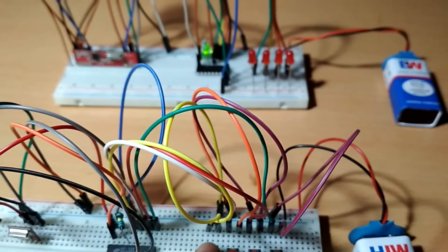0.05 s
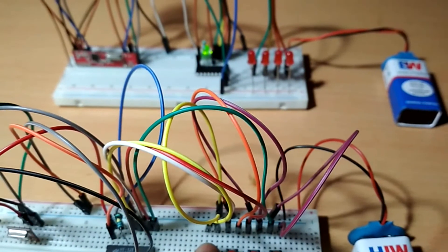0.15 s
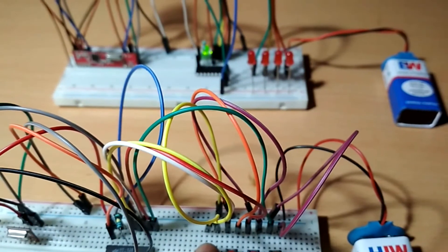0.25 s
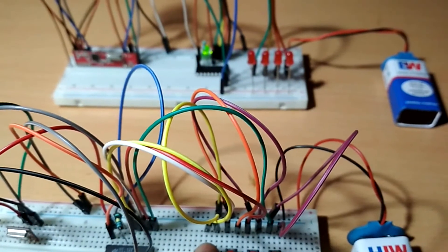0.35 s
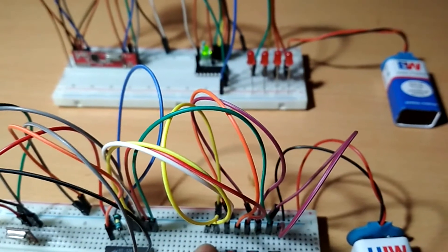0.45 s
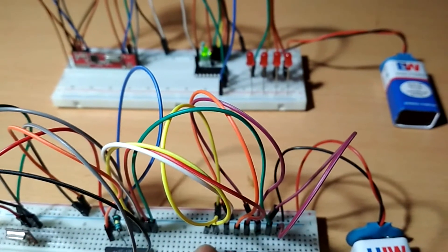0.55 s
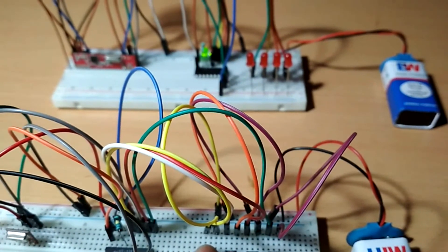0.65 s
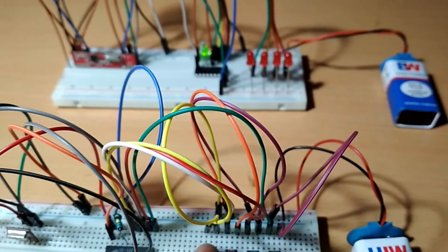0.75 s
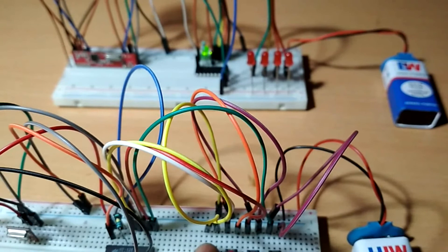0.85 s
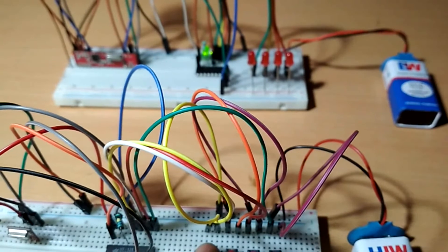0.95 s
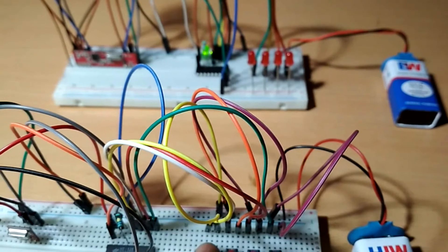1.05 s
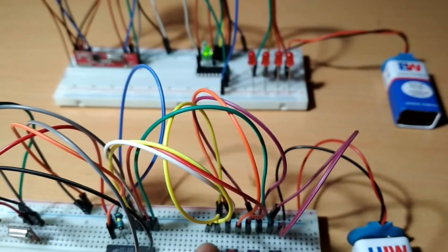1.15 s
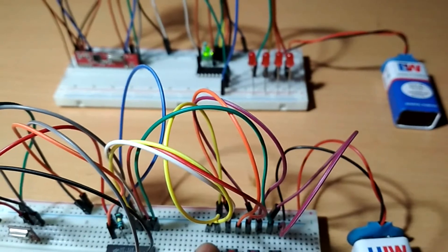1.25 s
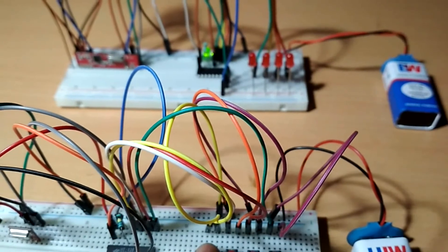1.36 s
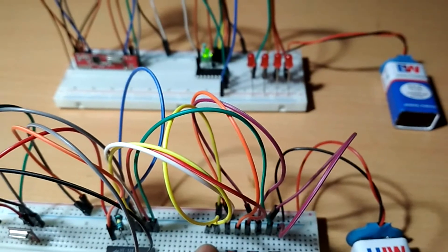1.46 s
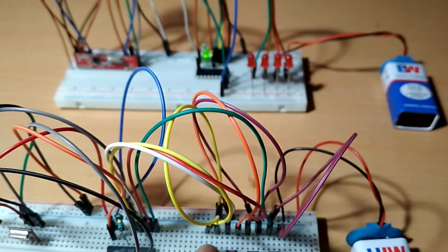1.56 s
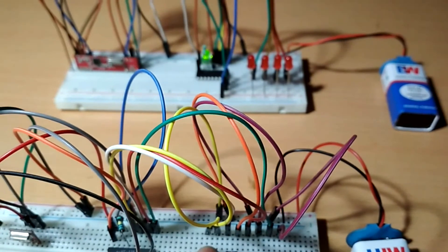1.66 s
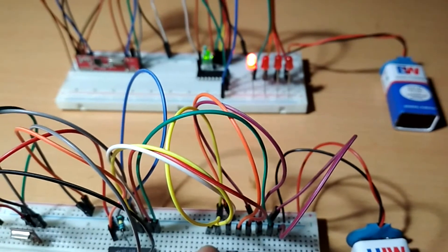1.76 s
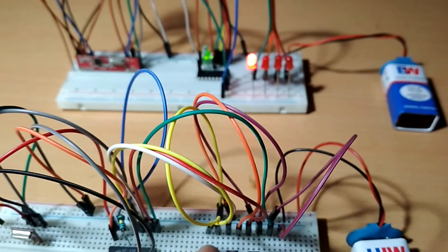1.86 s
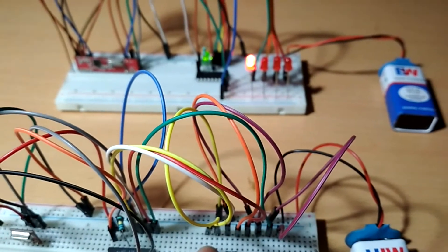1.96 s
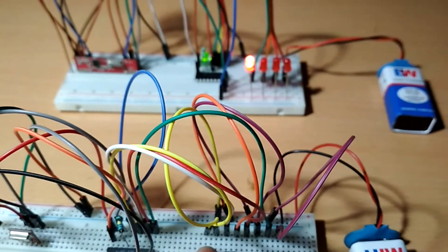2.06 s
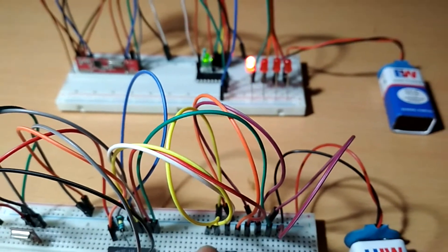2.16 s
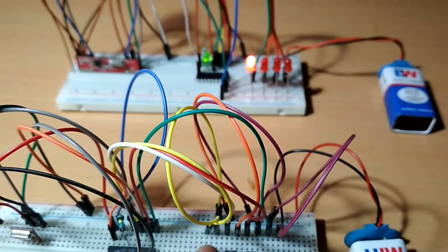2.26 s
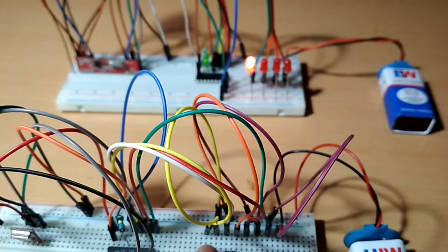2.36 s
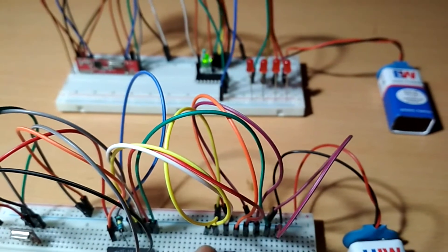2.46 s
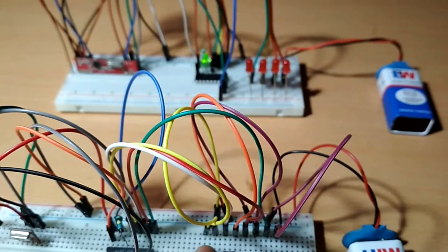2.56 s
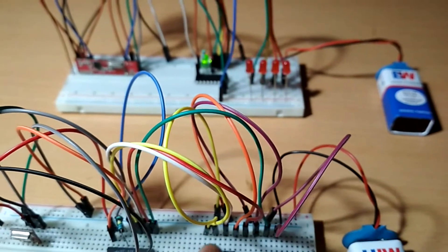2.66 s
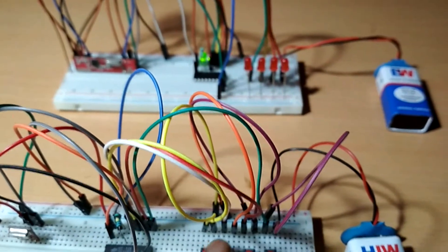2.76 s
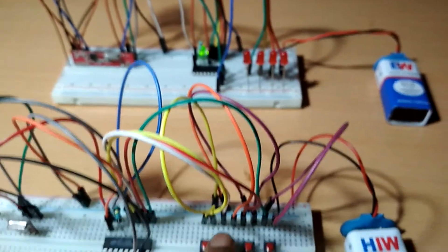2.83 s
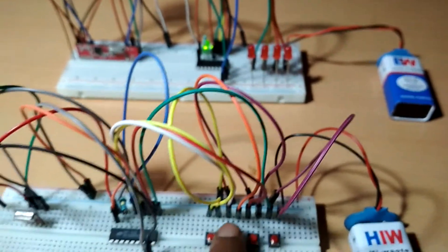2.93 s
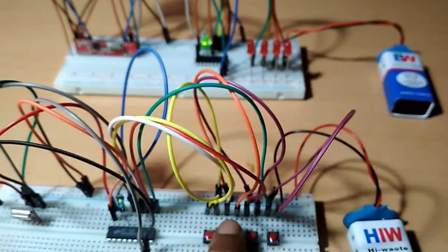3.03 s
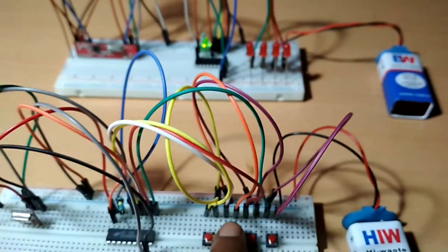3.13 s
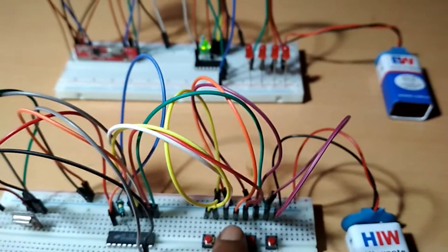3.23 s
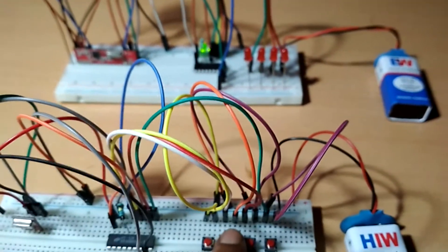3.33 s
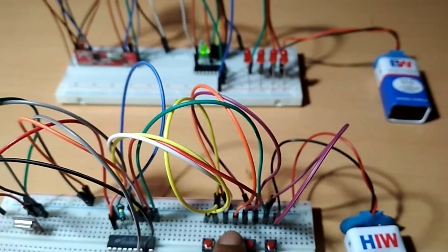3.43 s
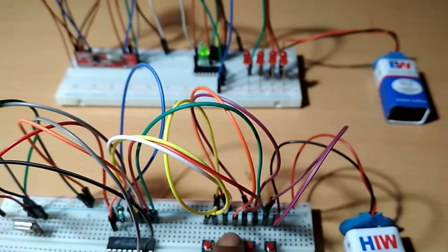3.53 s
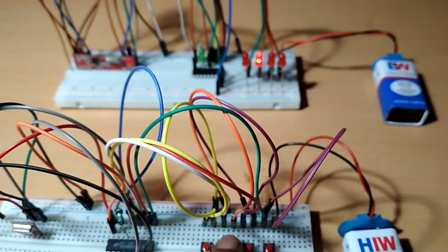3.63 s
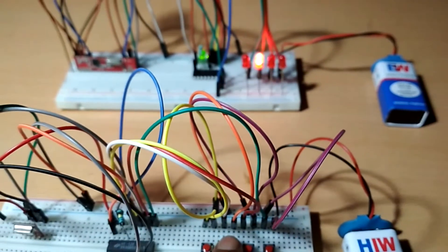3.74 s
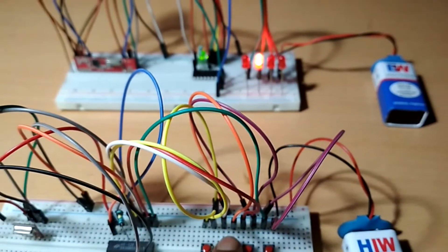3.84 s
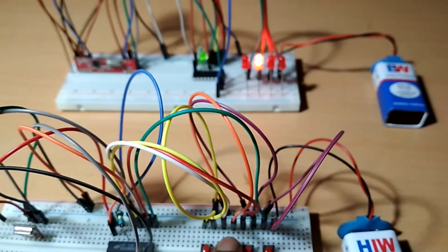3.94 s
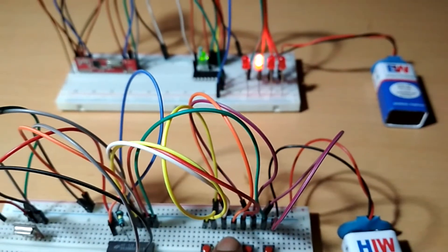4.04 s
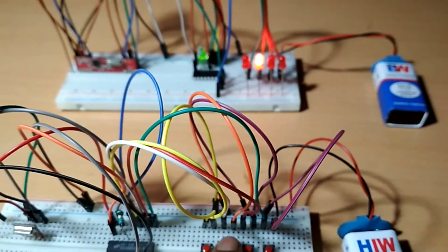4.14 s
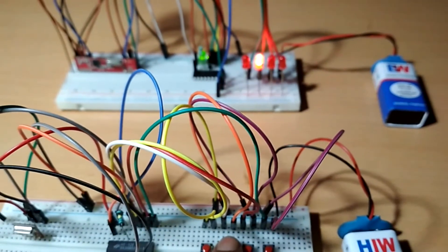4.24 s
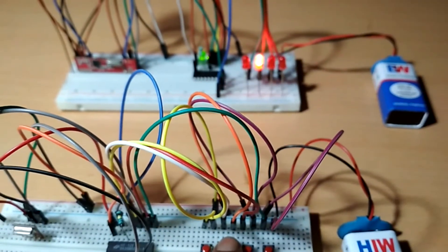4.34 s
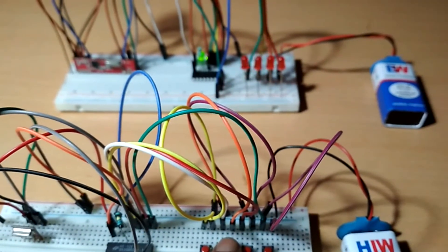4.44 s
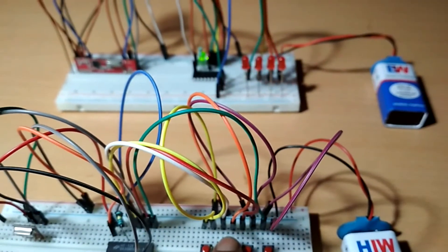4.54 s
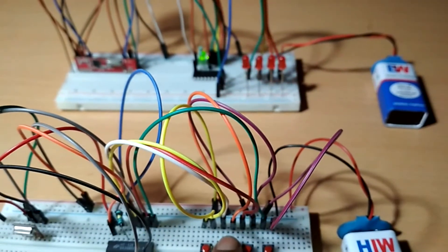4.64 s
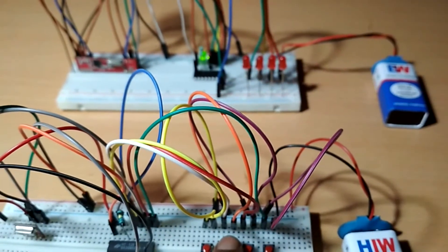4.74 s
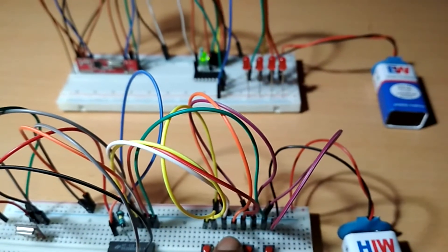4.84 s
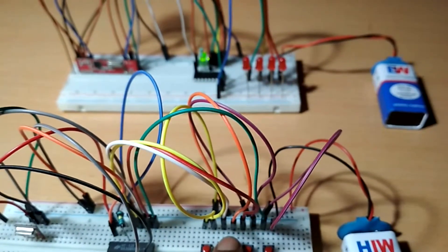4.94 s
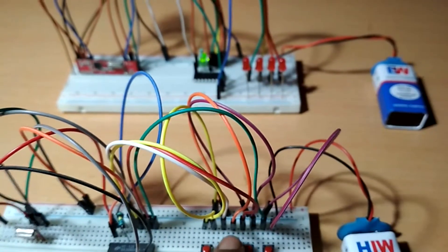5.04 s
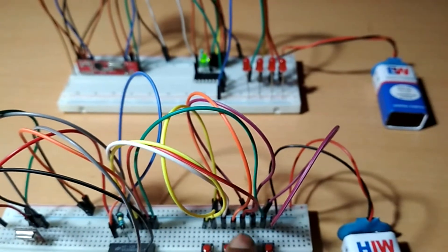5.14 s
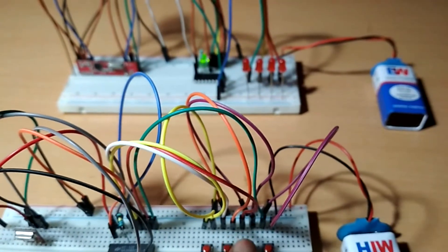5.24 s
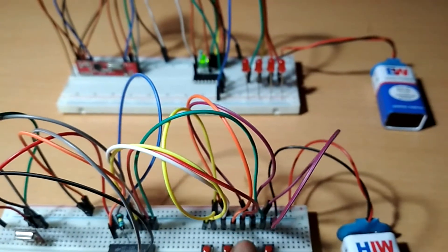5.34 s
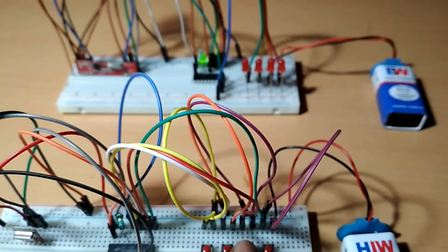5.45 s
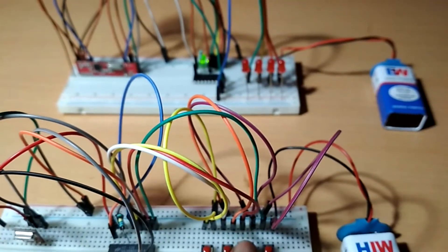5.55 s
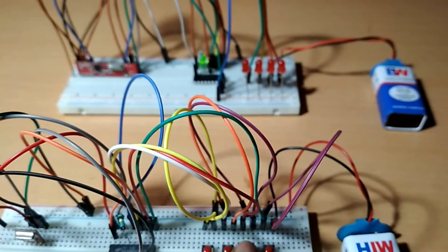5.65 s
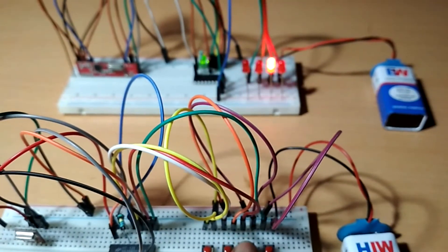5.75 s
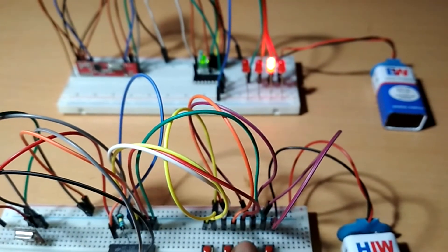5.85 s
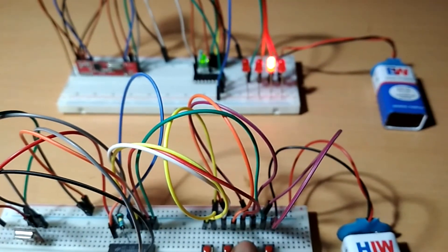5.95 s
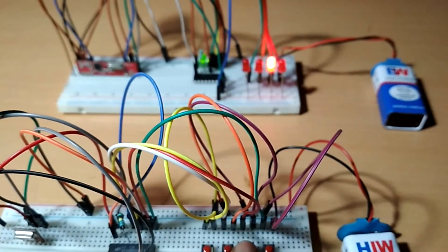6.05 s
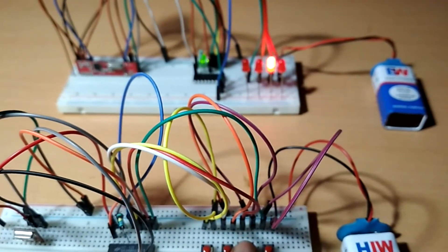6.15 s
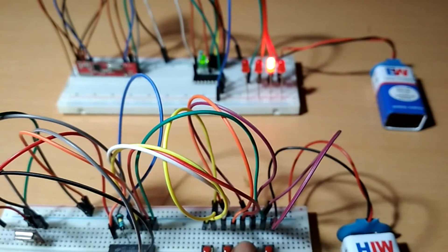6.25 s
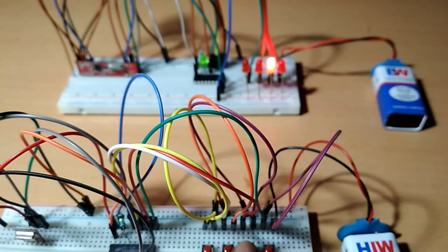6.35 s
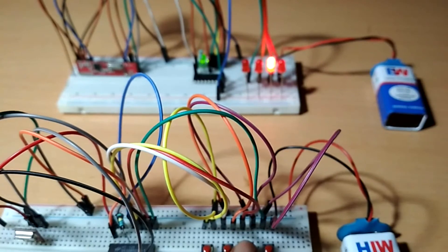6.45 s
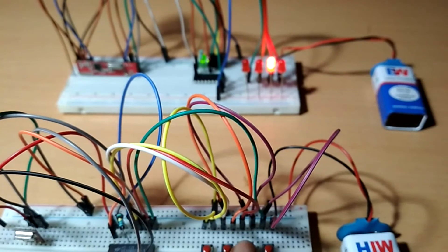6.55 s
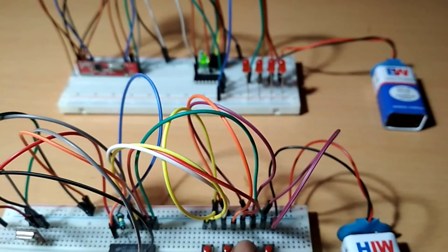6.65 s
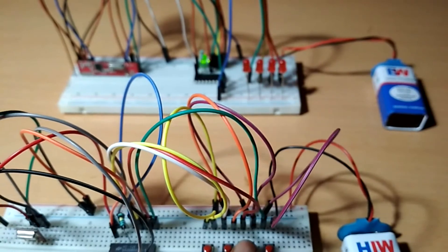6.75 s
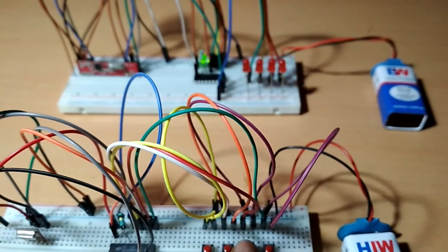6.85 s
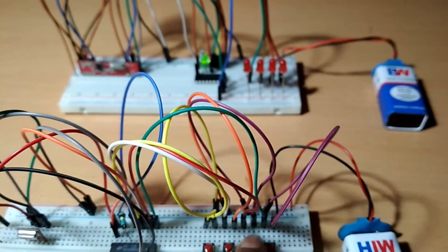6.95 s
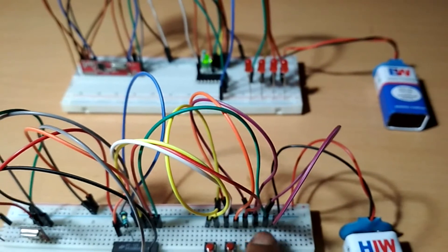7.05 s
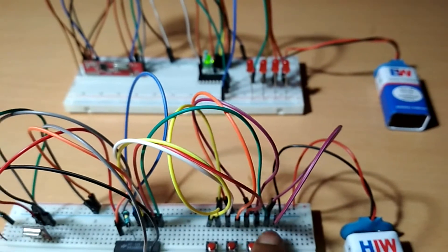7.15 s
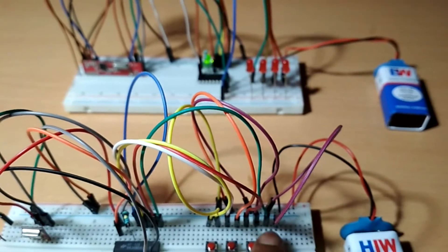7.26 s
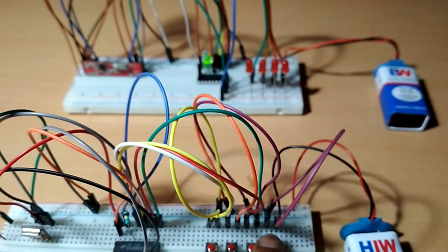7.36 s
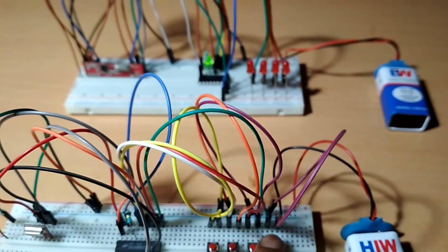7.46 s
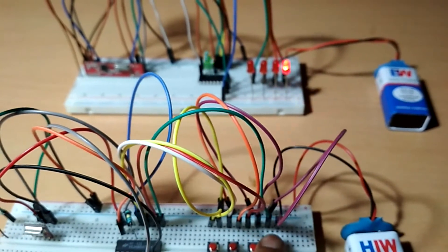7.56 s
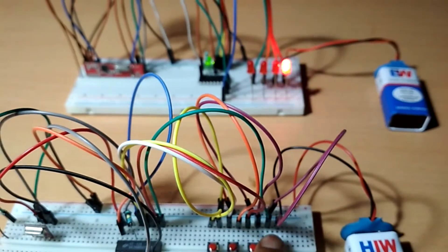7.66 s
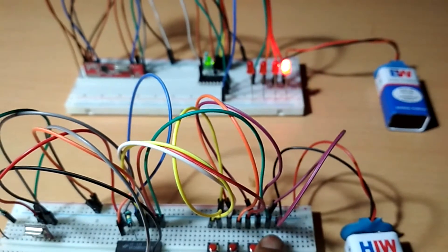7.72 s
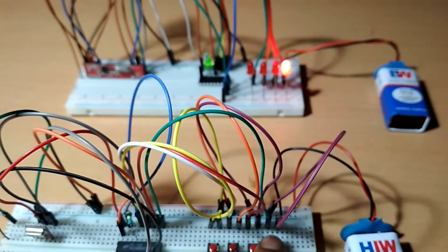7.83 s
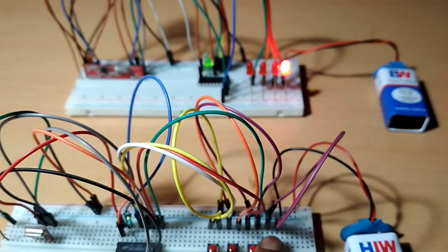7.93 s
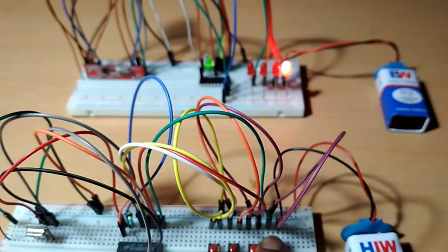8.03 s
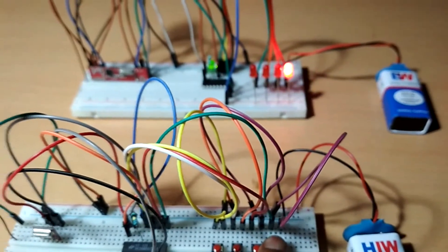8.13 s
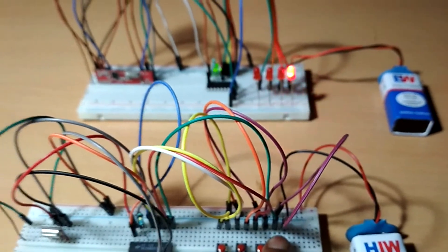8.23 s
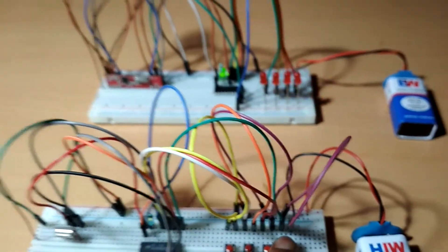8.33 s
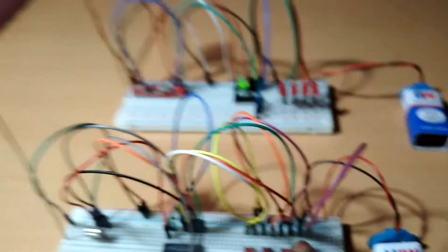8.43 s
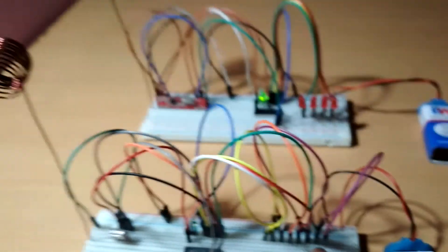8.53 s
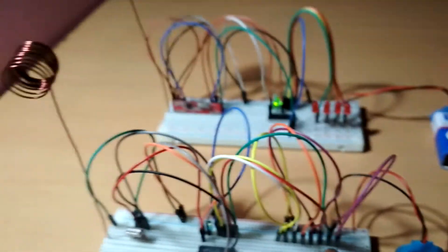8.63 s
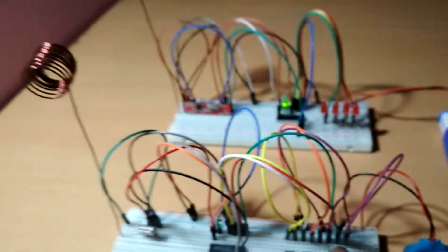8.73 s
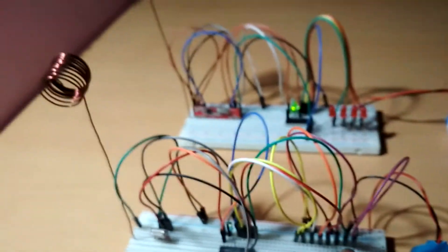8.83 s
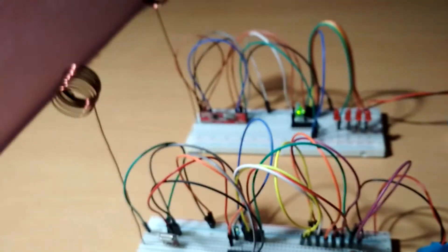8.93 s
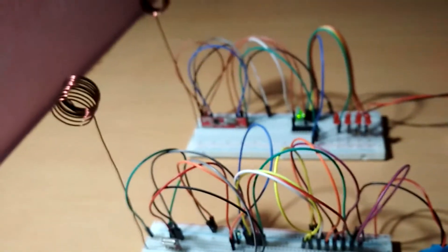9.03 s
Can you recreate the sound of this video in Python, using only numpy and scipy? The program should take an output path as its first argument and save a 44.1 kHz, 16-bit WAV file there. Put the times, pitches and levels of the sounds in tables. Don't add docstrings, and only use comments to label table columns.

```python
import sys
import numpy as np
from scipy import signal
from scipy.fft import rfft, irfft
from scipy.io import wavfile
from scipy.ndimage import uniform_filter1d

SR = 44100
rng = np.random.default_rng(int(sys.argv[2]) if len(sys.argv) > 2 else 0)


def store_pcm(level_fs):
    pcm = np.round(np.clip(level_fs, -1, 1) * 32767).astype(np.int16)
    wavfile.write(sys.argv[1], SR, np.atleast_2d(pcm).T)


def amplitude_ratio(level_db):
    exponent = np.asarray(level_db, float) / 20
    return 10 ** exponent


N = 400869

# pitch_hz, level_db (per Hz)
AIR_LEVELS = [(76, -29), (130, 0.5), (156, -7), (187, -3), (224, -4.5), (258, -5), (378, -12), (418, -8),
              (444, -15.5), (765, -11), (881, -16), (1750, -16), (3260, -20), (11800, -26), (16000, -30.5)]
# pitch_hz, likeness (0 to 1)
PORT_LIKENESS = [(60, 0.98), (180, 0.94), (550, 0.75), (1650, 0.1), (4970, 0.0), (15000, 0.094)]
# pitch_hz, left_minus_right_db
PORT_BALANCE = [(60, 0.0), (130, 0), (290, 1), (640, -2.5), (1410, 10), (3100, -1), (6820, 0.5),
                (15000, -12)]
# peak_s, peak_db, rise_s, fall_s
GRIP_SHIFTS = [
    (0.0, -55, .1, .12),
    (1.05, -64, 0.62, 0.37),
    (2.45, -49.5, 0.048, 0.14),
    (2.86, -54, 0.24, 0.2),
    (3.14, -58, 0.28, 0.42),
    (5.72, -65, 0.71, .6),
    (6.93, -64.5, .4, 0.59),
    (8.25, -64, 0.42, 0.57),
    (8.89, -68, .3, 0.29),
]
# peak_s, peak_db, rise_s, fall_s
TRAFFIC_SWELLS = [
    (0.0, -61, .3, 0.28),
    (1.47, -61.5, 0.12, 0.69),
    (2.33, -55, 0.33, 0.35),
    (2.97, -61, .6, 0.97),
    (5.25, -65.5, 1, 0.95),
    (5.87, -64, 0.44, 0.41),
    (6.61, -65.5, 0.37, 0.47),
    (7.54, -57, 0.14, 0.49),
    (8.75, -64, 0.96, 0.88),
]
# pitch_hz, width_hz, level_db
DRONE_BANDS = [(75.4, 13.7, 3.5), (96, 36.5, 0), (113.44, 5.9, 2)]
# pitch_hz, width_hz, level_db
WHIRR_BANDS = [(416, 31, -77), (595, 26, -88.5), (648.7, 10, -78.5), (1740, 184, -74.5),
               (10440, 3200, -70.5)]
# start_s, level_db, pitch_hz, left_minus_right_db
HAND_BUMPS = [
    (0.577, -45, 176, 33),
    (1.203, -52.5, 126, 22),
    (2.193, -38.5, 218, 32),
    (2.26, -58, 119, 1),
    (2.533, -38.5, 216, 24),
    (2.779, -50.5, 252, 23),
    (6.498, -64.5, 121, -2.0),
    (8.183, -47.5, 177, 20),
]
# start_s, level_db, pitch_hz, room_db (against the tap)
BOARD_TAPS = [(1.052, -45.5, 720, -37), (1.202, -50, 1620, -31), (1.736, -23.5, 1300, -26),
              (2.434, -36, 1190, -19.5), (2.779, -54.5, 1610, -28), (3.6728, -22, 1580, -25),
              (4.451, -34, 1430, -22.5), (5.2133, -36, 980, -38), (5.714, -21.5, 1740, -26.5),
              (6.699, -34, 1470, -33), (7.292, -39.5, 680, -38.5), (7.5901, -19, 1850, -29.5),
              (8.277, -55, 775, -15)]
# start_s, desk_db, pitch_hz, edge_db (against desk), room_db (against knock)
DESK_KNOCKS = [(1.736, -37, 284, -32, -17), (2.434, -29, 237, -4.5, -21.5), (3.671, -28, 298, -39, -22),
               (4.451, -30, 240, -15, -21.5), (5.715, -37.5, 380, -21, -6), (6.697, -25, 260, -31, -29.5),
               (6.762, -35, 238, -26, -23), (6.792, -38, 246, -29, -31), (7.592, -26, 363, -1.5, -18),
               (8.278, -25.5, 305, -15.5, -20.5), (8.341, -33, 396, -14, -22), (8.389, -41, 300, -9, -36),
               (8.457, -54.5, 237, -33.5, -7)]
# start_s, level_db, pitch_hz, left_minus_right_db, room_db (against the snap)
DOME_SNAPS = [
    (1.7355, -11, 10800, -5.5, -23.5),
    (2.4355, -14.5, 10800, -1.5, -25),
    (3.6728, -10, 11500, -6, -23),
    (4.4498, -13.5, 10800, -1, -26.5),
    (5.1262, -23, 10100, -1.5, -31),
    (5.7141, -9.5, 10200, -4, -23.5),
    (6.6985, -34, 12700, -7.5, -36),
    (7.5901, -3.5, 12800, -5.5, -26.5),
    (8.2791, -9.5, 10300, -10.5, -35.5),
]
# start_s, level_db, pitch_hz, left_minus_right_db, room_db (against the hit)
CAP_HITS = [
    (1.7363, -23, 3970, 2.5, -23),
    (2.4355, -26, 4700, 5, -26),
    (3.6734, -21, 4300, 8.5, -26),
    (4.4508, -24.5, 5040, 4, -25),
    (5.715, -22, 5700, 3, -23.5),
    (6.6985, -60, 4580, -2, -33),
    (7.5907, -18.5, 5670, 6, -23.5),
    (8.2806, -35, 5250, 9, -29),
]
# peak_s, peak_db, rise_s, fall_s
FINGER_SLIDES = [
    (5.117, -50, 0.0093, 0.11),
    (5.129, -44, 0.016, .01),
    (5.345, -69, .03, .15),
    (5.44, -65.5, .12, .25),
]
# pitch_hz, width_hz, left_db, right_db
DOME_MODES = [(7300, 1010, -5, -3), (8720, 1000, -0.5, -9.5), (10800, 1260, -18.5, 3),
              (12400, 1100, -8.5, 1.5), (14680, 2900, -5, -3), (14860, 390, -33, -22)]
CAP_MODES = [(3120, 1160, 0.22, 4.1), (4920, 690, 0.055, 5), (5330, 1400, 0.111, -3)]
BOARD_MODES = [(516, 153, 9.5, 0.5), (985, 297, -9.5, 2.5), (1130, 182, 6, 2.5), (1718, 277, 7, -4),
               (2040, 580, 2.5, -7)]
EDGE_MODES = [(539, 110, 0.78, -3), (747, 186, -2.5, -6)]
DESK_MODES = [(165, 50, -4.5, -4), (262, 33, 4, 3.5), (322, 73, 1, 1), (414, 78, -1, -2.5)]
ROOM_DECAY_S = {"dome": 0.27, "cap": 0.31, "board": .3, "edge": 0.42, "desk": 0.53}


def rms_one(x):
    return x / np.sqrt(np.mean(x ** 2) + 1e-20)


def at_hz(points, hz):
    table_hz, values = np.transpose(points)
    return np.interp(np.log(hz), np.log(table_hz), values)


def pair(alike, size):
    mid, side = rng.standard_normal((2, size))
    alike = np.clip(alike, 0, 1)
    shared = np.sqrt(1 + alike) * mid
    opposed = np.sqrt(1 - alike) * side * np.array([[1], [-1]])
    return (shared + opposed) / np.sqrt(2)


def chance(size, count):
    return uniform_filter1d(rng.standard_normal((2, size)), size=count) * np.sqrt(count)


def swells(rows):
    t = np.arange(N) / SR
    power = 0
    for peak_s, peak_db, rise_s, fall_s in rows:
        away = np.maximum((peak_s - t) / rise_s, (t - peak_s) / fall_s)
        power = power + amplitude_ratio(peak_db - 20 * away) ** 2
    return np.sqrt(power)


def resonance(x, hz, width_hz):
    r = np.exp(-np.pi * width_hz / SR)
    feed = np.array([1, 0, -1]) * (1 - r * r) / 2
    ring = [1, -2 * r * np.cos(2 * np.pi * hz / SR), r * r]
    return signal.lfilter(feed, ring, x + 1e-18)


def body(hits, modes):
    out, total_width_hz = 0, 0
    for k, (hz, width_hz, left_db, right_db) in enumerate(modes):
        sides = amplitude_ratio(np.array([[left_db], [right_db]]))
        out = out + (-1) ** k * sides * resonance(hits, hz, width_hz)
        total_width_hz += width_hz
    return out * SR / (2 * np.pi * total_width_hz)


def blows(times, level_db, room_db, lead_in_db, t60, alike, bounce_db, favoured=None):
    blow_delay_s, bounce_s = .0039, .0016
    tick_lead_s, tick_length_s, rattle_share = .0021, .0006, .9
    gate_s, gate_db_per_s = .15, 250
    ripple_db, grain_db = 3.5, 3
    out = np.zeros((2, N + SR))
    t = np.arange(SR // 2) / SR - blow_delay_s
    fade_db = -60 * t / t60 - gate_db_per_s * np.clip(t - gate_s, 0, None)
    tick = np.exp(-((t + tick_lead_s) / tick_length_s) ** 2)
    rattle = rattle_share * (t > -tick_lead_s) * (t < bounce_s + .001)
    lead_in = amplitude_ratio(lead_in_db) * (tick + rattle)
    for k, start_s in enumerate(times):
        grain = amplitude_ratio(grain_db * chance(len(t), count=25) * np.exp(-t / 0.064))
        ripple = amplitude_ratio(ripple_db * chance(len(t) // 2 + 1, count=90)[0])
        diffuse = irfft(ripple * rfft(pair(alike, size=len(t))), len(t))
        echoes = amplitude_ratio(room_db[k] + fade_db) * np.clip(t / 0.00057, 0, 1) * grain
        shape = (lead_in + echoes) * diffuse
        shape[:, round(blow_delay_s * SR)] += 1
        shape[:, round((blow_delay_s + bounce_s) * SR)] += amplitude_ratio(bounce_db)
        if favoured is not None:
            shape = resonance(shape, *favoured[k])
        first = round(start_s * SR)
        out[:, first:first + len(t)] += amplitude_ratio(level_db[k]).reshape(-1, 1) * shape
    return out[:, :N]


def air():
    out, edges = 0, 130 * 2 ** np.arange(0, 7.1, 1 / 3)
    for low, high in zip(edges, edges[1:]):
        hz = np.sqrt(low * high)
        band = signal.butter(2, [low, high], "band", fs=SR, output="sos")
        noise = signal.sosfilt(band, pair(at_hz(PORT_LIKENESS, hz), size=N))
        sides_db = at_hz(PORT_BALANCE, hz) * np.array([[.5], [-.5]])
        out = out + amplitude_ratio(at_hz(AIR_LEVELS, hz) + sides_db) * noise
    return amplitude_ratio(-64.5) * rms_one(out)


def grip_rumble():
    rumble = rms_one(resonance(resonance(pair(0.79, size=N), 26.8, 9.7), 20, 30.1))
    return amplitude_ratio(3.5) * np.hypot(amplitude_ratio(-73), swells(GRIP_SHIFTS)) * rumble


def building_drone():
    drone = 0
    for hz, width_hz, level_db in DRONE_BANDS:
        band = resonance(resonance(pair(0.96, size=N), hz, width_hz), hz, 2.9 * width_hz)
        drone = drone + amplitude_ratio(level_db) * rms_one(band)
    return amplitude_ratio(5.0) * np.hypot(amplitude_ratio(-67), swells(TRAFFIC_SWELLS)) * rms_one(drone)


def whirr():
    out = 0
    for hz, width_hz, level_db in WHIRR_BANDS:
        noise = pair(at_hz(PORT_LIKENESS, hz), size=N)
        out = out + amplitude_ratio(level_db) * rms_one(resonance(noise, hz, width_hz))
    return out


def hand():
    out = np.zeros((2, N))
    for start_s, level_db, hz, pan_db in HAND_BUMPS:
        push = np.zeros(SR // 10)
        contact = round(SR / hz / 2)
        push[:contact] = 4 * np.hanning(contact)
        thud = resonance(resonance(push, hz, 0.29 * hz), hz, 2.3 * hz)
        sides = amplitude_ratio(level_db + 10.5 + np.array([[0], [-pan_db]]))
        first = round(start_s * SR)
        out[:, first:first + len(push)] += sides * thud
    return out


def board():
    s, level_db, hz, room_db = np.transpose(BOARD_TAPS)
    favoured = np.c_[hz, np.full(len(s), 590)]
    taps = blows(s, level_db + 13.5, room_db, -30, ROOM_DECAY_S["board"], alike=0.09,
                 bounce_db=-14.5, favoured=favoured)
    return body(taps, BOARD_MODES)


def desk():
    s, desk_db, hz, edge_db, room_db = np.transpose(DESK_KNOCKS)
    sides = desk_db[:, None] + np.zeros(2)
    top = blows(s - .003, sides + 10.2, room_db - 11.5, -48, ROOM_DECAY_S["desk"], alike=0.9,
                bounce_db=-24, favoured=np.c_[hz, .45 * hz])
    edge = blows(s, sides + edge_db[:, None] + 5.5, room_db - 3.5, -48, ROOM_DECAY_S["edge"], alike=0.64,
                 bounce_db=-17)
    return body(top, DESK_MODES) + resonance(body(edge, EDGE_MODES), 500, 540)


def domes():
    s, dome_db, hz, pan_db, room_db = np.transpose(DOME_SNAPS)
    sides = dome_db[:, None] + (pan_db[:, None] + 3.0) * [.5, -.5] + 18.0
    snaps = blows(s, sides, room_db, -28, ROOM_DECAY_S["dome"], alike=0.033,
                  bounce_db=-1.5, favoured=np.c_[hz, .65 * hz])
    no_lows = signal.butter(4, 6800, "high", fs=SR, output="sos")
    return signal.sosfilt(no_lows, body(snaps, DOME_MODES))


def caps():
    s, cap_db, hz, pan_db, room_db = np.transpose(CAP_HITS)
    sides = cap_db[:, None] + pan_db[:, None] * [.5, -.5] + 11.0
    hits = blows(s, sides, room_db, -28, ROOM_DECAY_S["cap"], alike=0.086,
                 bounce_db=-1.5, favoured=np.c_[hz, .9 * hz])
    no_lows = signal.butter(4, 2600, "high", fs=SR, output="sos")
    return signal.sosfilt(no_lows, body(hits, CAP_MODES))


def fingertip():
    hiss = resonance(body(pair(.1, size=N), DOME_MODES), 10000, 6000)
    return swells(FINGER_SLIDES) * rms_one(hiss)


def scene():
    room = air() + grip_rumble() + building_drone() + whirr()
    return room + hand() + board() + desk() + domes() + caps() + fingertip()


def drop_weak_patches(x):
    hz, _, bins = signal.stft(x, SR, nperseg=2048, noverlap=1024)
    power = np.abs(bins) ** 2 + 1e-20
    share = uniform_filter1d(power, size=7, axis=1) / uniform_filter1d(power, size=121, axis=1)
    rel_db = 10 * np.log10(uniform_filter1d(share, size=3, axis=2))
    total = power[:, hz > 2000].sum(axis=1, keepdims=True)
    loudest = np.maximum(total, np.roll(total, -1, axis=2))
    steady = loudest < 8 * np.roll(total, 1, axis=2)
    weak = np.clip(-8.8 - rel_db, 0, 1) * (hz > 2300)[:, None] * steady
    return signal.istft(bins * amplitude_ratio(-24 * weak), SR, nperseg=2048, noverlap=1024)[1][:, :N]


def roll_off(x):
    return signal.sosfilt(signal.butter(12, 16830, fs=SR, output="sos"), x)


def record(dry):
    rounded = drop_weak_patches(.72 * np.tanh(dry / .72))
    shelf = signal.sosfilt(signal.ellip(8, .5, 30, 15850, fs=SR, output="sos"), rounded)
    mix = signal.sosfilt(signal.cheby2(10, 50, 17300, fs=SR, output="sos"), shelf)
    return roll_off(mix)


dry = scene()
out = record(dry)
store_pcm(out)
```